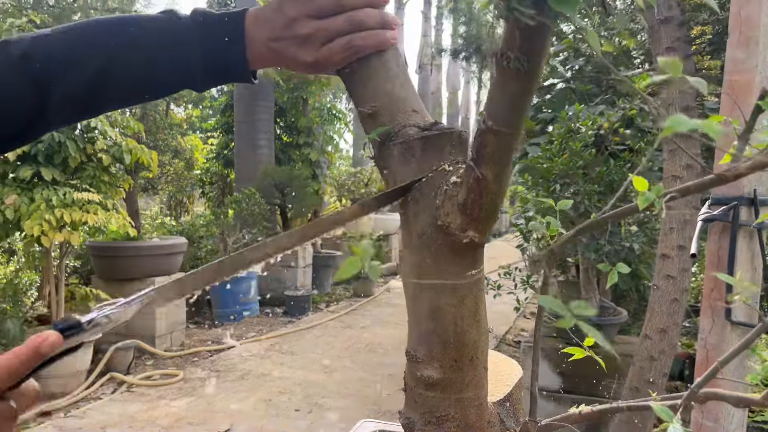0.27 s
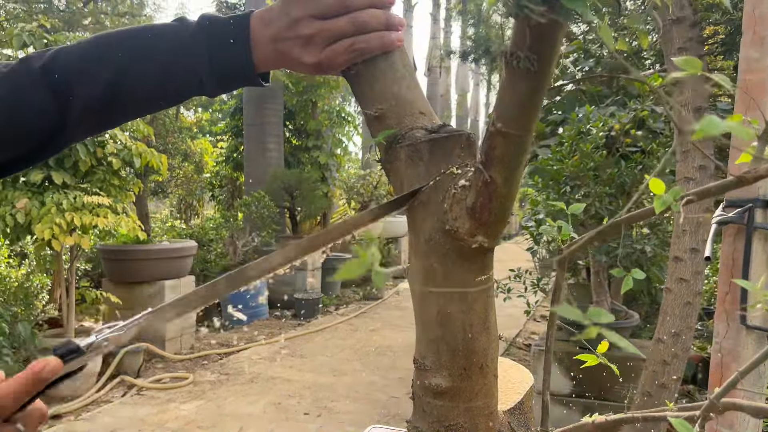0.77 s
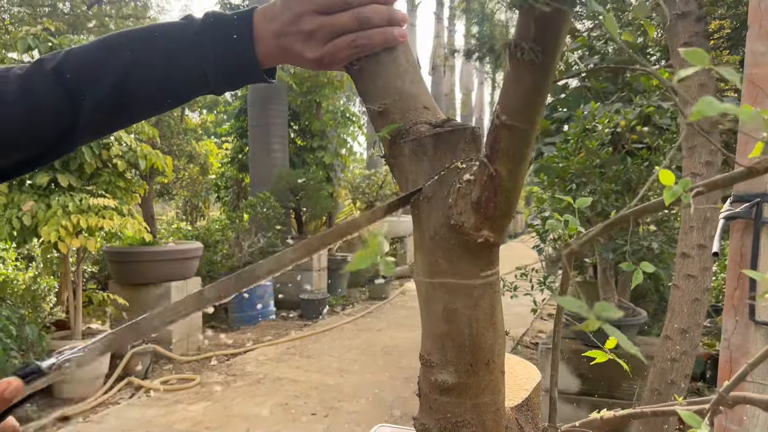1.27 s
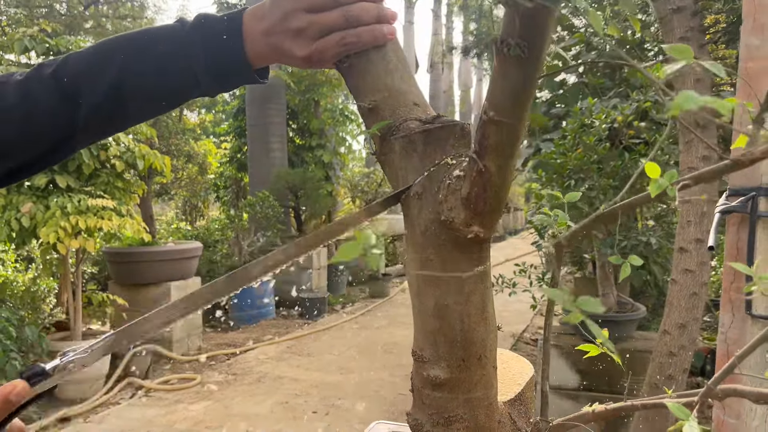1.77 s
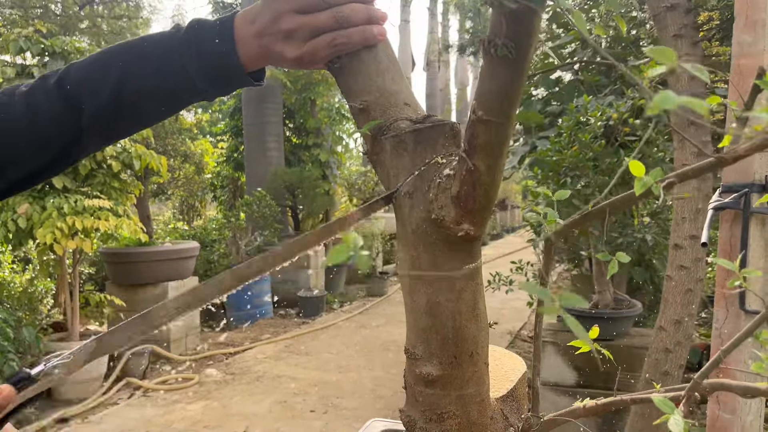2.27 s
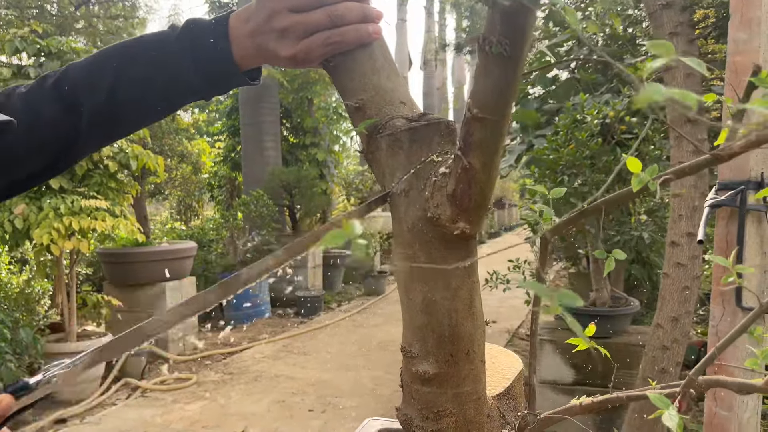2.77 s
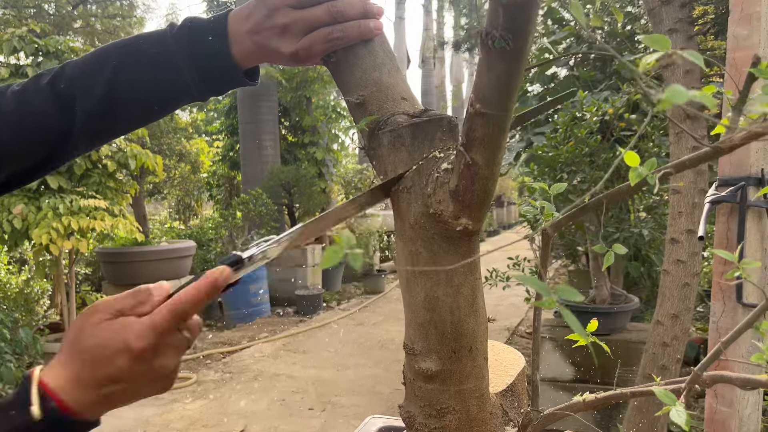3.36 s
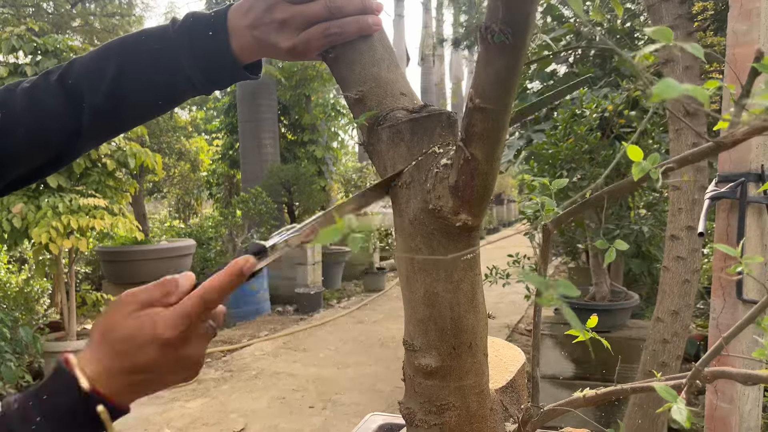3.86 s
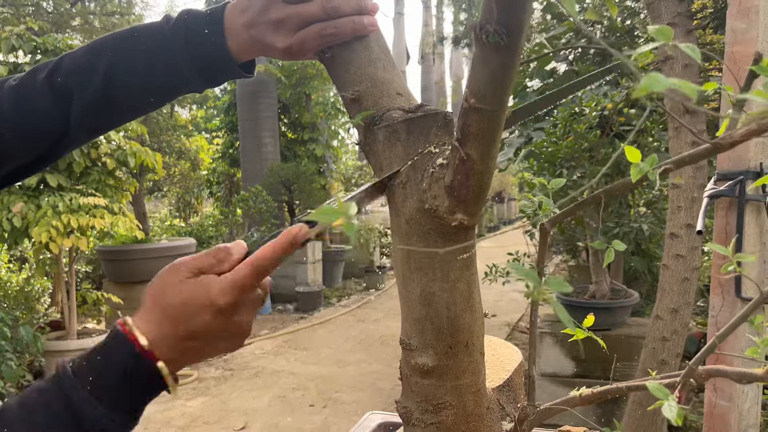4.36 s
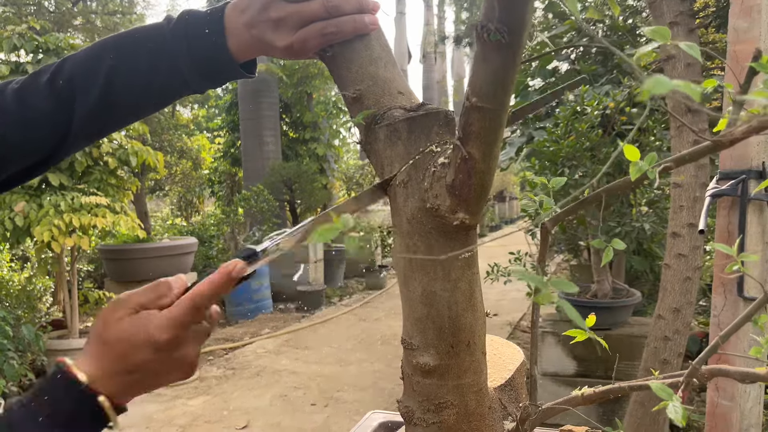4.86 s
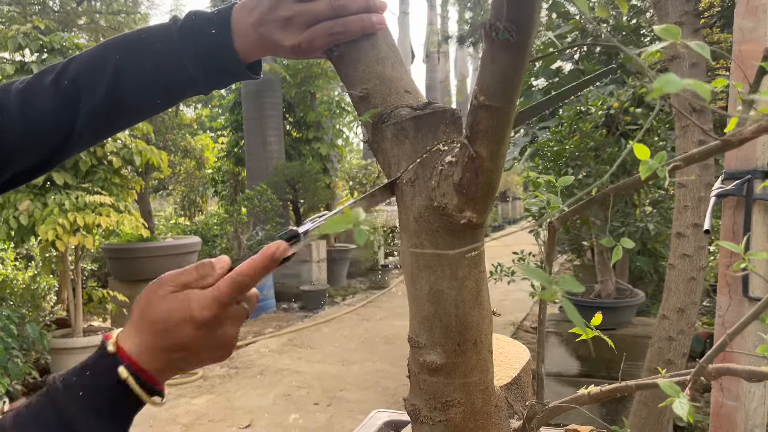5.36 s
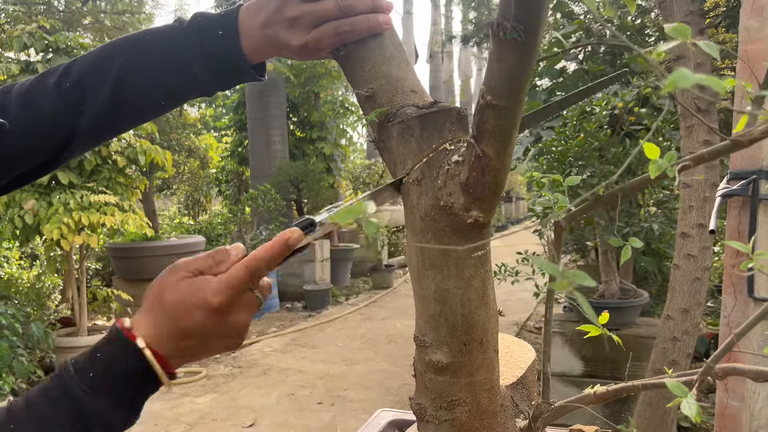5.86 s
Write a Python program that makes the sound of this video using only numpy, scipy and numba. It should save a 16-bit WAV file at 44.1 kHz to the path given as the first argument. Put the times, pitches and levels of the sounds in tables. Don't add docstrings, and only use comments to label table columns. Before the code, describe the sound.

A coarse hand saw works close by in a quiet open garden, with faint air and a distant engine wavering near 60 Hz. From 0.05 s a pull rasps, peaking around 0.2 s, then a softer return comes near 0.4 s. Pulls repeat about every half second, peaking near 0.74, 1.25, 1.74 and 2.18 s, and so on to 6.05 s, with quieter pushes between. Each pull opens with a tiny bright catch, strong at 1.56 s, then swells through gritty torn fibre, ringing steel around 4 kHz and chip hiss, ending abruptly. The strokes strengthen until about 2.5 s, then stay even. Trunk knock and low limb rumble colour them. After 4.5 s the steel pitch sinks and the wood grows fuller; soft short hums touch returns near 4.85, 5.3 and 5.8 s. The sawing continues to the end, dry and slightly wide.

```python
import sys
import numpy as np
from scipy import signal
from scipy.fft import rfft, irfft
from scipy.io import wavfile
from scipy.ndimage import uniform_filter1d, map_coordinates
from numba import njit

SR = 44100
rng = np.random.default_rng(int(sys.argv[2]) if len(sys.argv) > 2 else 0)


def volts_from_decibels(level):
    exponent = np.asarray(level, float) / 20
    return 10 ** exponent


def wav_out(sig):
    wavfile.write(sys.argv[1], SR, np.round(np.clip(np.atleast_2d(sig).T, -1, 1) * 32767).astype(np.int16))


N = 269010
HZ = np.arange(N // 2 + 1) * SR / N


def unit(x):
    return x / np.sqrt(np.mean(x ** 2))


def along(table, index=1):
    t = np.array(table, float)
    return np.interp(np.log(HZ + 1), np.log(t[:, 0]), t[:, index])


def over_time(table, t):
    s, *columns = np.transpose(table)
    return [np.interp(t, s, c) for c in columns]


def walk(rate):
    k = int(SR / rate)
    held = np.repeat(rng.standard_normal(N // k + 1), k)
    return 1.2 * uniform_filter1d(uniform_filter1d(held, k), k)[:N]


@njit
def svf(x, hz, width):
    y, b, l = np.empty(len(x)), 0., 0.
    for i in range(len(x)):
        g, k = np.tan(np.pi * hz[i] / SR), width / hz[i]
        v = (b + g * (x[i] - l)) / (1 + g * (g + k))
        b, l, y[i] = 2 * v - b, l + 2 * g * v, k * v
    return y


def ring(force, modes, drift, flicker_db, centre_hz=None):
    hz, width, db = np.transpose(modes)
    if centre_hz is not None:
        db = db[:, None] - 6.65 * np.log2(hz[:, None] / centre_hz) ** 2
        db = db - 10 * np.log10(np.sum(width[:, None] * volts_from_decibels(2 * db), axis=0))
    total = np.zeros(N)
    for k in range(len(hz)):
        level = volts_from_decibels(db[k] + flicker_db * walk(60))
        total += (-1) ** k * level * svf(force, hz[k] * (1 + drift * walk(12)), width[k])
    return unit(total)


def flecks(force, modes_hz, centre_hz):
    total = np.zeros(N)
    for f in modes_hz:
        level = volts_from_decibels(4.5 * walk(45) - 12 * np.log2(f / centre_hz) ** 2)
        total += level * svf(force, f * (1 + .015 * walk(8)), 40 + .01 * f)
    return unit(total)


def saw():
    t = np.arange(N) / SR
    bite, trunk_level, chip_level, sway, low_gain, free_hz, speed = controls(t)
    heard = []
    for _ in range(2):
        force = tearing(speed, gate=.5, grit_db=1.1)
        cut = volts_from_decibels(2.0) * bite * blade(force, free_hz)
        cut += volts_from_decibels(-1.63) * trunk_level * trunk(force, free_hz, low_gain)
        cut += volts_from_decibels(7.5) * chip_level * chips(force)
        heard.append(cut + volts_from_decibels(0.5) * sway * limb())
    return heard[0] + hum(t, speed), heard[1]


def tearing(speed, gate, grit_db):
    teeth_hz = 507
    tooth = np.cumsum(teeth_hz * speed * (1 + .25 * walk(150)) / SR) % 1
    burst = 1 - gate + gate * np.exp(-tooth / 0.35)
    grit = volts_from_decibels(grit_db * rng.exponential(size=N))
    return unit(burst * volts_from_decibels(0.79 * walk(120)) * grit * rng.standard_normal(N))


# (pitch [Hz], width [Hz], level [dB])
BLADE_RINGS = [(2335, 930, -4.5), (3564, 760, -1), (3985, 340, 1), (4410, 990, 0.5), (5290, 414, -1),
               (5610, 525, -2), (6190, 790, -2.5), (6540, 380, -5.5)]
STEEL_FLECKS = [2480, 2750, 3160, 3460, 3900, 4130, 4370, 4600, 4880, 5150, 5880, 6470]


def blade(force, free_hz):
    return ring(force, BLADE_RINGS, 0.025, 1.88, free_hz) + volts_from_decibels(-6.5) * flecks(force, STEEL_FLECKS, free_hz)


# (pitch [Hz], width [Hz], level [dB])
TRUNK_RINGS = [(602, 250, -12.5), (859, 120, -2), (1233, 310, -8.5), (1517, 103, 2), (1739, 290, -6)]
GRAIN_FLECKS = [660, 820, 915, 1340, 1530, 1600, 1800]


def trunk(force, free_hz, low_gain):
    wood = ring(force, TRUNK_RINGS, 0.027, 2.0) + volts_from_decibels(-7) * flecks(force, GRAIN_FLECKS, free_hz / 3.2)
    low_ring_hz, low_ring_width_hz = 870., 300.
    return wood + (low_gain - 1) * svf(wood, np.full(N, low_ring_hz), low_ring_width_hz)


# (pitch [Hz], level [dB])
CHIP_COLOUR = [(5000, -30), (7000, -2), (8000, 0), (9600, -2), (11500, 0), (13000, -2), (15500, -3),
               (17000, -10)]
# (pitch [Hz], width [Hz], level [dB])
WHISTLES = [(8400, 150, 0), (8820, 250, -2)]


def chips(force):
    hiss = unit(irfft(rfft(force) * volts_from_decibels(along(CHIP_COLOUR)), N))
    return hiss + volts_from_decibels(-5) * ring(force, WHISTLES, .002, 1.2)


# (pitch [Hz], width [Hz], level [dB])
LIMB_RINGS = [(125, 46, -4.5), (204.6, 26, 1.5), (259.3, 34.7, 2), (520, 244, -8)]


def limb():
    return ring(rng.standard_normal(N), LIMB_RINGS, 0.047, 1.57)


def stroke(row, rule, shares):
    on, top, off, top_db, hz = row
    attack, release, on_db, off_db, swell_db, low = rule
    rest_db = -73
    s = [on - attack, on, (on + top) / 2, top, off, off + release]
    db = [rest_db, on_db, (on_db + top_db) / 2 + swell_db, top_db, off_db, rest_db]
    return np.array([s, db, *shares, hz * np.array([low, low, (1 + low) / 2, 1, 1, 1])])


# (teeth bite [s], hardest [s], teeth let go [s], hardest level [dB], blade pitch there [Hz])
PULL_STROKES = [(.070, .224, .282, -31, 4300), (.621, 0.742, 0.8, -30, 4440),
                (1.102, 1.249, 1.293, -26.5, 4460), (1.589, 1.74, 1.778, -27, 4420),
                (2.063, 2.18, 2.237, -24.5, 4380), (2.548, 2.677, 2.747, -23.5, 4070),
                (3.031, 3.154, 3.214, -23.5, 4250), (3.508, 3.626, 3.693, -25, 4190),
                (3.986, 4.101, 4.184, -25, 4100), (4.496, 4.624, 4.684, -24.5, 3800),
                (4.99, 5.108, 5.17, -24, 3820), (5.478, 5.588, 5.648, -24.5, 3520),
                (5.979, 6.046, 6.15, -23.5, 3300)]
# (teeth bite [s], hardest [s], teeth let go [s], hardest level [dB], blade pitch there [Hz])
PUSH_STROKES = [(-.15, -.08, -.018, -34, 3800), (.35, 0.408, .49, -35.5, 3420),
                (.871, 0.948, 1.01, -32, 3220), (1.346, 1.444, 1.492, -32, 4110),
                (1.828, 1.935, 1.97, -33, 3800), (2.297, 2.39, 2.445, -31, 4100),
                (2.789, 2.89, 2.953, -30.5, 4210), (3.268, 3.383, 3.424, -30, 4330),
                (3.761, 3.861, 3.914, -31.5, 4220), (4.25, 4.374, 4.409, -31.5, 4080),
                (4.759, 4.872, 4.92, -31, 4200), (5.239, 5.345, 5.401, -33.5, 3710),
                (5.731, 5.83, 5.895, -31.5, 3697)]
# (attack [s], release [s], bite level [dB], let-go level [dB],
# swell half way up [dB], pitch share at the bite [0-1])
PULL_SHAPE = (.056, .045, -41, -36, 2, 0.9)
PUSH_SHAPE = (.06, .054, -45, -37.5, 3.0, 0.98)
# (at rest [dB], bite [dB], half way up [dB],
# hardest [dB], let go [dB], rest again [dB])
PULL_MIX = [(2, 3.5, -5.5, -11.5, -5.5, -1.5), (-6.5, -6, -7, -10.5, -9, -10)]
PUSH_MIX = [(0, 3, -6.5, -9.5, -1, 2), (-9, -7.5, -10.5, -10, -11.5, -7.5)]
# (time [s], trunk gain [dB], chip gain [dB], limb gain [dB], low trunk ring gain [dB])
DEEPENING = [(0, 2, 2.5, 1.5, -5), (1.0, 0, 2, -.5, -5), (2.6, -2, -2, -2.5, .5), (3.6, -1, -1.5, -.5, 2.5),
             (4.6, 1, -1, 0, 1.5), (6.1, 2.5, 2.5, 1.5, 3.5)]


def controls(t):
    strokes = [stroke(k, PULL_SHAPE, PULL_MIX) for k in PULL_STROKES]
    strokes += [stroke(k, PUSH_SHAPE, PUSH_MIX) for k in PUSH_STROKES]
    strokes.sort(key=lambda k: k[0, 1])
    ms = t[::44]
    each = np.array([[np.interp(ms, k[0], c) for c in k[1:]] for k in strokes])
    loudest = each[:, :1].argmax(axis=0)[None]
    lead = uniform_filter1d(np.take_along_axis(each, loudest, axis=0)[0], size=5, axis=1)
    bite_db, trunk_db, chip_db, free_hz = (np.interp(t, ms, c) for c in lead)
    deep_trunk, deep_chip, deep_limb, low_db = over_time(DEEPENING, t)
    sway_db = -49.5 + 0.3 * (bite_db + 40) + deep_limb + 1.8 * walk(25)
    halts = [(a[0, -1] + b[0, 0]) / 2 for a, b in zip(strokes, strokes[1:])]
    turns = [strokes[0][0, 0]] + halts + [strokes[-1][0, -1]]
    speed = np.abs(np.sin(np.pi * np.interp(t, turns, np.arange(len(turns)))))
    trunk_db = bite_db + trunk_db + deep_trunk
    chip_db = bite_db + chip_db + deep_chip
    return *volts_from_decibels([bite_db, trunk_db, chip_db, sway_db, low_db]), free_hz, speed


# (time [s], length [s], pitch at full speed [Hz], level [dB])
TOOTH_HUMS = [
    (4.85, .1, 480, -53),
    (5.3, .14, 470, -50),
    (5.815, .09, 620, -50),
]


def hum(t, speed):
    waver = speed ** .6 * (1 + .02 * walk(40))
    total = np.zeros(N)
    for at, length, hz, db in TOOTH_HUMS:
        swell = volts_from_decibels(db + 1.5 * walk(30)) * np.exp(-(2 * (t - at) / length) ** 4)
        total += swell * np.sqrt(2) * np.sin(2 * np.pi * np.cumsum(hz * waver) / SR)
    return total


# (pitch [Hz], left leads [rad], left minus right [dB], likeness [0-1])
PORT_DIFFERENCES = [(100, 0, 0, .98), (500, -.4, -2, .9), (1000, .3, -2, .9), (1600, -.4, -3, .85),
                    (2000, 0, 0, .99), (3200, 1.3, -2, .75), (4300, .3, -1.5, .75), (5000, 1.0, -3, .65),
                    (5500, -.9, -4, .5), (6300, -.15, 0, .95), (7100, -1.5, 2.5, .7), (8250, -3.14, 0, .93),
                    (12100, -6.28, 0, .93), (15400, -9.42, 0, .95)]


def ports(direct, scattered):
    like = np.clip(along(PORT_DIFFERENCES, index=3), 0, 1)
    shading = volts_from_decibels(along(PORT_DIFFERENCES, index=2) / 2)
    half = shading * np.exp(.5j * along(PORT_DIFFERENCES, index=1))
    shared = np.sqrt((1 + like) / 2) * rfft(direct)
    unlike = np.sqrt((1 - like) / 2) * rfft(scattered)
    return np.array([irfft((shared + unlike) * half, N), irfft((shared - unlike) / half, N)])


# (time [s], peak level [dB])
TOOTH_CATCHES = [(0.0483, -42), (0.5791, -31.5), (1.071, -29), (1.5628, -22), (2.049, -27), (2.534, -32),
                 (3.0184, -30), (3.492, -26), (3.9609, -30), (4.2405, -37), (4.4842, -27), (4.9776, -26),
                 (5.449, -26.5), (5.9584, -27)]


def catches():
    t = np.arange(N) / SR
    burst = np.zeros(N)
    for at, db in TOOTH_CATCHES:
        since = np.abs(t - at)
        fade = np.exp(-since / 0.0046) + 0.49 * np.exp(-since / .025)
        burst += (t > at) * volts_from_decibels(db - 14.5) * fade
    mid, side = rng.standard_normal((2, N)) * burst
    return np.array([svf(mid + k * side, np.full(N, 4500.), 14000.) for k in (.6, -.6)])


# (time [s], pitch [Hz], level [dB])
ENGINE = [(0, 62.5, -37.5), (0.249, 62.6, -32.5), (.44, 61, -49), (.6, 58.44, -43.5), (1.15, 59.95, -53),
          (1.41, 59.04, -35), (1.53, 59.9, -47), (1.9, 57.95, -45), (2.07, 56.96, -59),
          (2.14, 57.13, -43.5), (2.6, 57.4, -42), (2.9, 60.03, -44), (3.3, 58.25, -53.5), (4.04, 57.4, -40),
          (4.5, 57.15, -46), (4.8, 58, -57), (5.5, 60.95, -46), (6.1, 62, -46.5)]


def drone():
    hz, db = over_time(ENGINE, np.arange(N) / SR)
    hz = hz * (1 + .03 * walk(11) * np.clip((-38 - db) / 8, 0, 2))
    level = volts_from_decibels(db + 2.52 * walk(14) * np.clip((-33 - db) / 9, 0, 1.4))
    tone = np.sqrt(2) * np.sin(2 * np.pi * np.cumsum(hz) / SR) * level
    return tone * (1 + 0.081 * walk(9) * np.array([[1], [-1]]))


# (pitch [Hz], level [dB per Hz])
AIR_COLOUR = [(20, -23), (45, 3), (90, 7), (160, -18), (600, -14), (1500, -37), (4000, -41), (9000, -54),
              (16000, -72)]


def garden():
    mid, side = rfft(rng.standard_normal((2, N))) * volts_from_decibels(along(AIR_COLOUR))
    side = side * np.clip(0.16 + HZ / 1500, 0, 1)
    return unit(irfft(np.array([mid + side, mid - side]), N)) * volts_from_decibels(-47 + 1.8 * walk(1.65))


def scene():
    left, right = ports(*saw())
    lag = .08 * walk(14) + .04 * walk(1.5)
    right = map_coordinates(right, [np.arange(N) + lag], order=5, mode="nearest")
    return np.array([left, right]) + catches() + drone() + garden()


def joint(x, mid_db, side_db):
    hz, _, (mid, side) = signal.stft([x[0] + x[1], x[0] - x[1]], SR, nperseg=2048)
    bands, bins = 64, 16

    def band_power(v):
        power = (abs(v[1:]) ** 2).reshape(bands, bins, v.shape[1])
        return np.repeat(power.mean(axis=1), bins, axis=0)

    m, s = band_power(mid), band_power(side)
    loud_db = 10 * np.log10((m + s)[200:].sum(axis=0) + 1e-12)
    steady = (loud_db > np.median(loud_db) - 17) & (np.abs(np.gradient(loud_db)) < 8)
    waver_db = 3 * rng.standard_normal((bands, 1)) * rng.standard_normal(m[:bands].shape)
    waver = volts_from_decibels(np.repeat(waver_db, bins, axis=0))
    f = hz[1:, None]
    mid[1:][steady & (m < s * waver * volts_from_decibels(2 * mid_db)) & (f > 6500)] = 0
    side[1:][steady & (s < m * waver * volts_from_decibels(2 * side_db - 15 * (f < 9000))) & (f > 1500)] = 0
    mid, side = signal.istft([mid, side], SR, nperseg=2048)[1][:, :N]
    return np.array([mid + side, mid - side]) / 2


def band_limit(x):
    return signal.sosfilt(signal.butter(12, 15760, fs=SR, output="sos"), x)


def record(dry):
    top_cut = signal.ellip(8, .2, 70, 15800, fs=SR, output="sos")
    mix = joint(signal.sosfilt(top_cut, dry), mid_db=-5, side_db=-5.0)
    return band_limit(mix)


dry = scene()
out = record(dry)
wav_out(out)
```